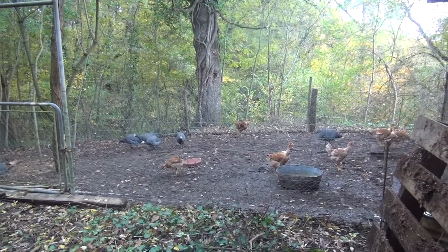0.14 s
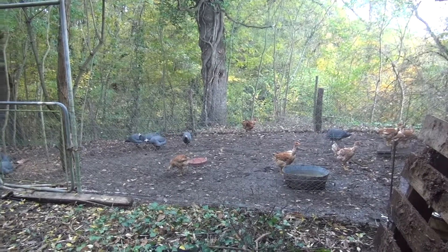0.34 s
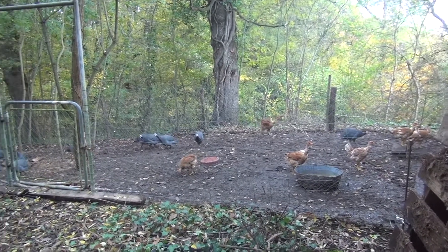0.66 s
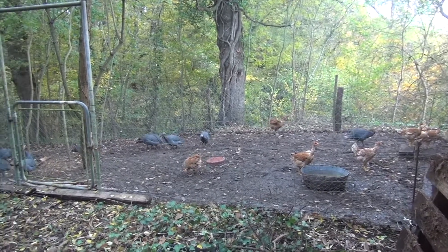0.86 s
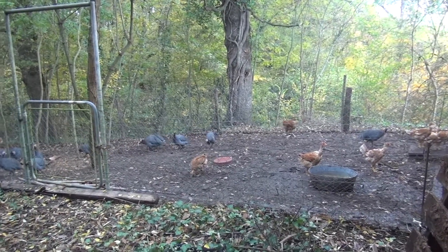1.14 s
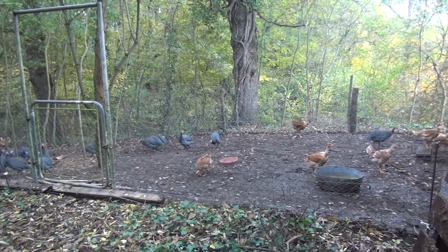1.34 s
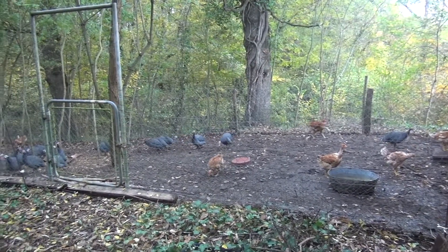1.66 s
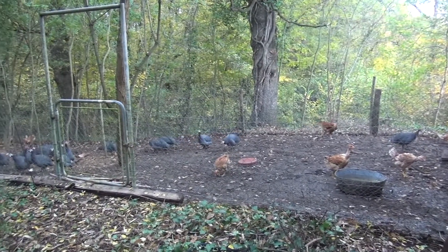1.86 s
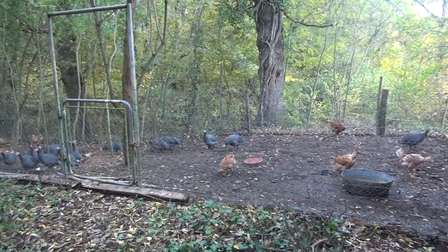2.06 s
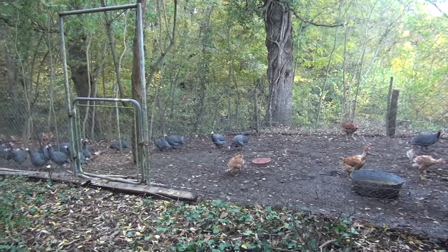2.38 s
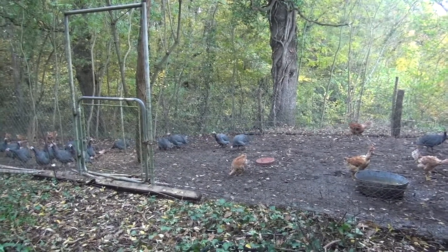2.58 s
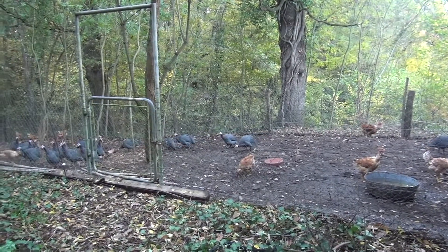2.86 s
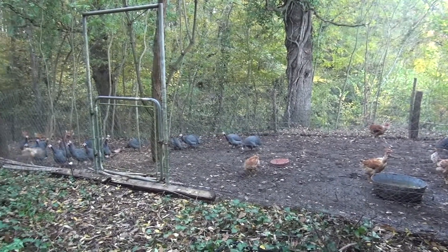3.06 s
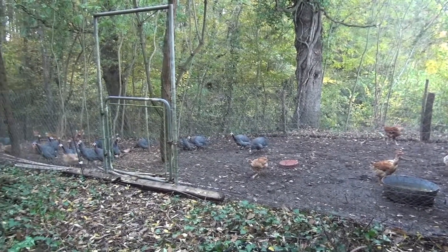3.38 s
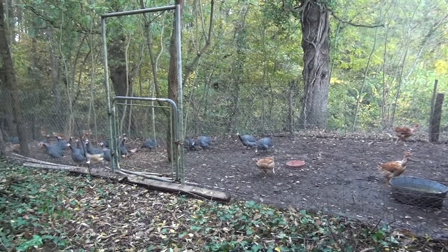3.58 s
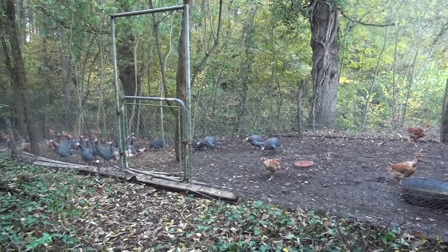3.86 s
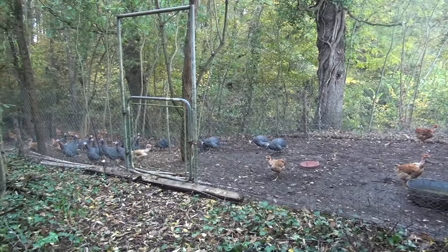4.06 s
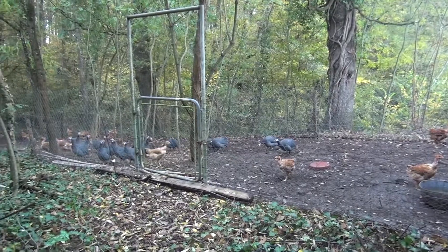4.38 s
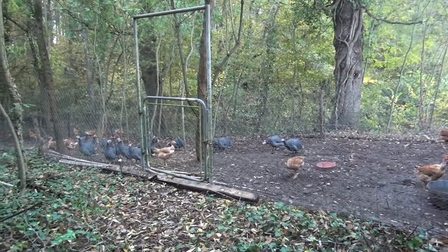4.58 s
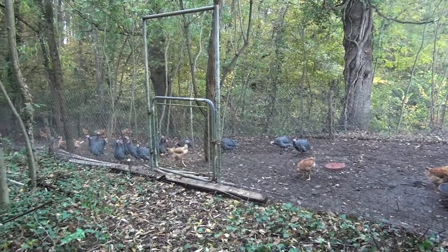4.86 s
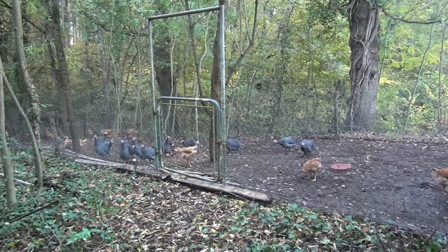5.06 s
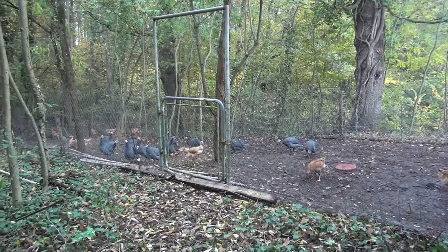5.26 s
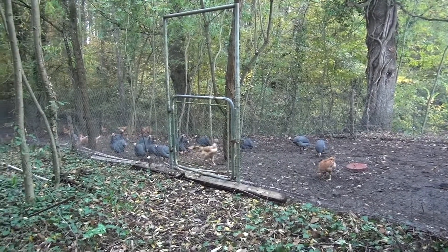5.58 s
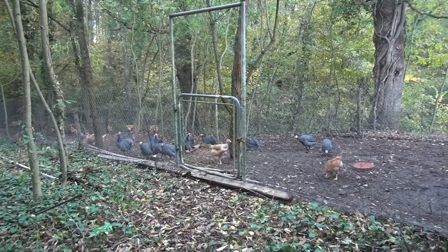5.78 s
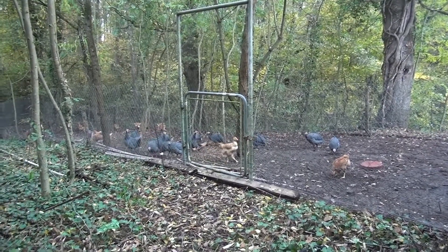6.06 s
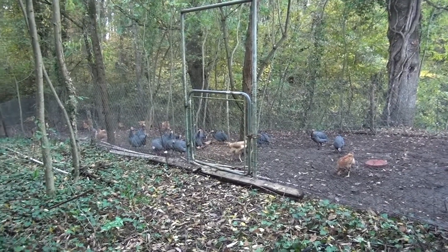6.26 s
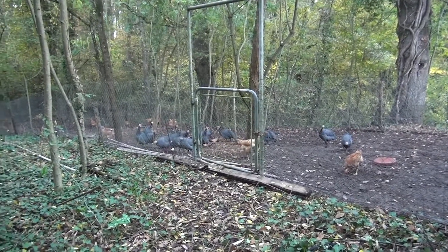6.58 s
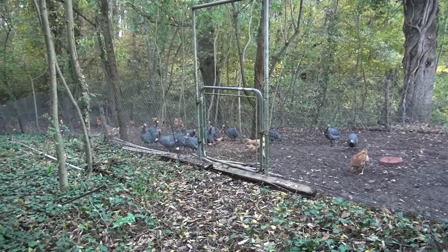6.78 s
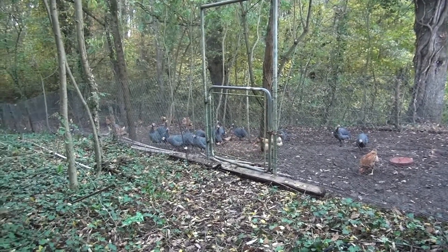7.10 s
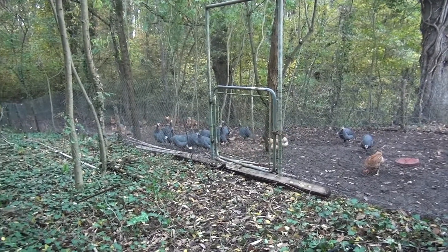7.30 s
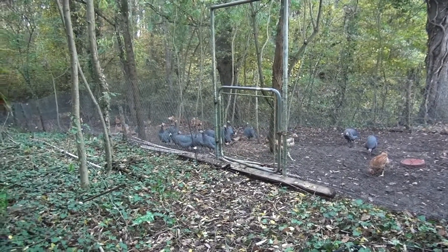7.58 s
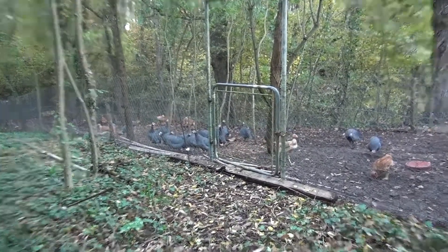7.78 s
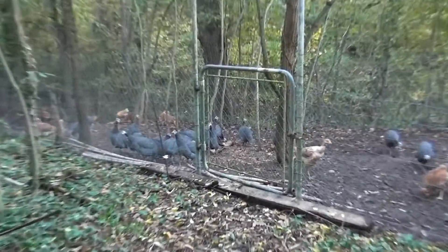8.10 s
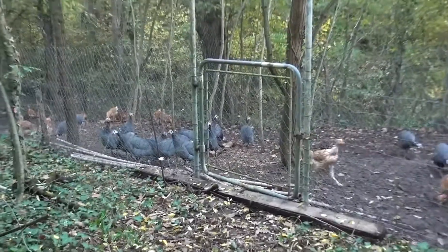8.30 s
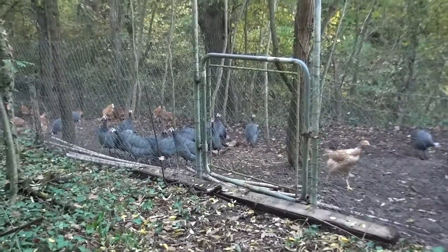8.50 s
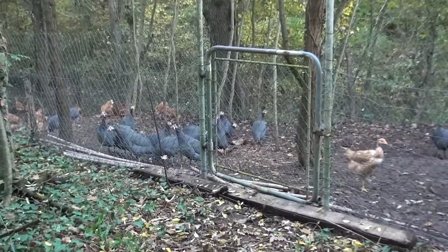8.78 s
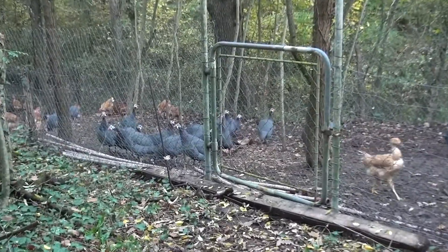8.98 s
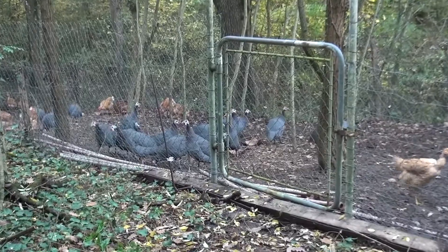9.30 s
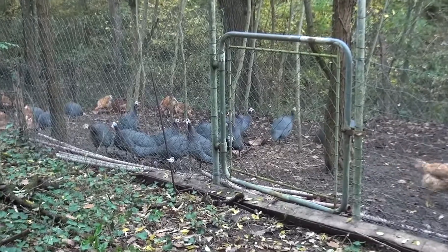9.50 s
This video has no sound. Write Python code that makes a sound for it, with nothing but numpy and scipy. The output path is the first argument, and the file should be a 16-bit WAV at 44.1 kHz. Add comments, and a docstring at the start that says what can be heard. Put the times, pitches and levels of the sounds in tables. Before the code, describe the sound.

Rapid, steady squawks from one guineafowl echo lightly among trees, with some microphone handling rumble at the start.

```python
"""Guineafowl at the edge of a wood

A guineafowl repeats a harsh cry about four times a second: a tick, a falling chirp and a short whistle
that breaks into a rasp. A fast membrane sings the whistle; a slow one beats out the rasp, whose pulses
excite the resonances of throat and beak. The ground cancels narrow bands and the trees scatter the
sound back. A hand-held microphone rumbles at first, over outdoor noise and a low hum."""
import sys
import numpy as np
from scipy import signal
from scipy.fft import rfft, irfft, next_fast_len
from scipy.io import wavfile
from scipy.ndimage import uniform_filter1d

SR = 44100
rng = np.random.default_rng(int(sys.argv[2]) if len(sys.argv) > 2 else 0)


def int16_out(signal):
    """Quantize to a 16-bit WAV file."""
    q = np.round(np.clip(np.atleast_2d(signal).T, -1, 1) * 32767)
    wavfile.write(sys.argv[1], SR, q.astype(np.int16))


N = 425124
RUN_IN = SR // 4   # samples before time zero, where the first cry begins


# Each row: start, length and whistle hold in seconds, base rasp pitch in Hz, force in dB.
CRIES = [(-.056, 0.061, 0.017, 307, 1.5), (0.183, 0.051, 0.0165, 304.5, -0.5),
         (.418, 0.056, .023, 315.8, -2.5), (0.638, .055, 0.026, 324, -3),
         (0.886, 0.058, 0.011, 307.6, -1.5), (1.147, .057, 0.008, 303, -0.5),
         (1.362, 0.055, 0.016, 309.4, 1), (1.582, .063, 0.012, 311.5, 3), (1.818, 0.062, 0.0083, 308.2, 2),
         (2.054, 0.07, 0.0056, 310.9, 1.5), (2.269, 0.063, 0.014, 306.3, -4),
         (2.497, 0.064, 0.0092, 309.3, -1), (2.751, 0.07, .014, 315.5, 0.5),
         (2.996, 0.058, 0.0062, 313.7, -0.5), (3.243, 0.064, 0.011, 308.8, 1.5),
         (3.545, 0.062, 0.012, 320.4, -1.5), (3.887, 0.063, 0.019, 320.6, -2),
         (4.141, 0.059, .006, 313.7, -2.5), (4.421, .065, 0.011, 314.5, -1.5),
         (4.681, 0.066, 0.011, 314.5, 1), (4.916, 0.065, 0.0099, 309.6, 2), (5.130, .068, 0.02, 313.6, 2),
         (5.401, .069, .011, 306.3, 1), (5.641, .068, 0.018, 309.3, 2.5),
         (5.855, 0.071, 0.0093, 314.2, 3.5), (6.078, 0.068, 0.016, 310.5, 2.5),
         (6.295, .078, 0.019, 321, 4.5), (6.526, 0.067, 0.029, 326.3, 3.5),
         (6.767, 0.065, 0.018, 316.2, 2.5), (7.011, .066, 0.019, 314, 3.5), (7.246, 0.065, 0.023, 319.5, 3),
         (7.470, 0.066, 0.03, 322.4, 2), (7.720, 0.068, 0.024, 323.2, 3), (7.955, 0.068, 0.025, 321, 3),
         (8.193, 0.07, 0.043, 308, 1.5), (8.426, 0.059, 0.012, 305.3, 1), (8.718, 0.058, 0.016, 313, 3.5),
         (8.995, 0.064, .022, 320.2, 3.5), (9.284, .069, 0.019, 309.5, 2.5), (9.565, 0.06, 0.015, 320, 1.5)]
# The bird grows keener, then eases a little. Each row: time in seconds, keenness from 0 to 1.
KEENNESS = [(.7, 0.01), (2.0, .35), (3.0, 0.21), (5.6, .5), (6.3, 0.76), (7.4, 0.99), (8.2, 0.97),
            (8.45, 0.65), (9.6, 0.68)]

def guineafowl():
    """Superposition: the cries add into one run, each voiced with the keenness of its moment."""
    out = np.zeros(RUN_IN + N + SR)
    t = np.arange(-SR // 36, SR // 10) / SR
    for start_s, *shape in CRIES:
        keenness, = columns_at(KEENNESS, start_s)
        start = RUN_IN + round((start_s + t[0]) * SR)
        out[start:start + len(t)] += cry(t, keenness, *shape)
    return out


# The course of a cry. Each row: share of its length, frequency ratios of rasp and throat,
# then level offsets in dB of throat, bright edge and deep note.
CRY_COURSE = [(0, 1.02, 1.07, 1, 2, -1.5), (.25, 1.015, 1.128, 5, 4.5, -3), (.48, 1.0, 1.066, 3, 4.5, 0),
              (.72, .975, 1.015, 6.5, 1, -3.5), (.93, .935, 0.962, 4, -6.5, -.5),
              (1.2, 0.882, .78, 9.5, -7, -1)]

def cry(t, keenness, length, hold, rasp_hz, force_db):
    """Source and filter: after chirp and whistle, a rasp of sagging pitch excites throat and beak."""
    share = t / length
    sag, glide, throat_arc, edge_arc, deep_arc = columns_at(CRY_COURSE, share)
    tilt_db = by_keenness(-0.9, 2.5, keenness) + 0.1 * force_db   # brightness of the voice
    roughness = from_db(2.5 * rng.standard_normal()) * (1 - 0.41 * fade(share - 0.7, 0.15))
    pitch_hz = rasp_hz * sag * (1 + 0.012 * wobble(70, len(t)))
    pulses, slow_phase = rasp(pitch_hz, jitter=0.03 * roughness, shimmer_db=2.6, breath=0.5 * roughness)
    # the treble throbs a few times in each cry
    throb = np.sin(2 * np.pi * (62 * t + rng.random() + 0.2 * wobble(55, len(t))))

    throat_db = by_keenness(-19, -18, keenness) + 0.06 * force_db + throat_arc
    voice = from_db(throat_db) * throat(pulses, length, glide, keenness)
    voice += beak(pulses, share, glide, throb, tilt_db, keenness)
    # the longer the whistle is held, the stronger it is and the less rasp sounds under it
    extra_hold_s = hold - 0.016
    under_whistle = from_db(-7.5 - 348 * extra_hold_s)
    rasp_gain = under_whistle + (0.92 - under_whistle) * fade(t - hold, 0.0097)
    voice = butterworth(voice, 6, 791, "high") * rasp_gain
    voice += from_db(-31.5 + force_db + edge_arc + 2.6 * throb) * bright_edge(pulses, tilt_db)
    voice *= fade(t - 0.001, 0.0074) * fade(length + 0.0023 - t, 0.0036)

    deep = from_db(deep_arc - 30) * deep_note(slow_phase)
    deep *= fade(t - hold, 0.018) * fade(length + 0.0097 - t, 0.0053)
    whistle_db = by_keenness(-19, -22, keenness) + 88 * extra_hold_s
    whistle_hz = by_keenness(1335, 1436, np.sqrt(keenness))
    note = from_db(whistle_db) * whistle(t, hold, whistle_hz, tilt_db, slow_phase)
    return chirp(t, keenness) + tick(t) + note + voice + deep


def rasp(pitch_hz, jitter, shimmer_db, breath):
    """Pulse excitation: the slow membrane slaps unevenly, one puff a cycle. Returns sound and phase."""
    size = len(pitch_hz)
    cycles = np.cumsum(pitch_hz) / SR
    uneven = np.maximum.accumulate(cycles + jitter * wobble(330, size))
    slaps = np.diff(np.floor(uneven), prepend=np.floor(uneven[0]))
    slaps *= from_db(shimmer_db * wobble(270, size))
    puffs = rng.standard_normal(size) * (1 + np.cos(2 * np.pi * uneven)) ** 2
    return rms_one(slaps) + breath * rms_one(puffs), 2 * np.pi * cycles


def throat(pulses, length, glide, keenness):
    """Cavity resonance: a longer cry opens the throat further, which lowers its frequency."""
    usual_length_s, drop_hz_per_s = 0.065, 5300
    hz = by_keenness(1703, 1528, keenness) - drop_hz_per_s * (length - usual_length_s)
    return evened(resonance(pulses, hz * glide, width_hz=306))


# Resonances of windpipe and beak. Each row: centre and width in Hz, then relative level in dB
# early, midway and late in the cry.
FORMANTS = [(909.5, 89, -8, -15, -17), (1166, 152, -4.5, -9.5, -11.5), (2210, 128, 4.5, -1.5, -5),
            (2967, 510, 7.5, -21, -3), (3380, 290, 3, 3, -0.5), (3882, 294, 3, 3, -5),
            (4318, 387, 5, 1, -6)]

def beak(pulses, share, glide, throb, tilt_db, keenness):
    """Formants: parallel resonances shape the rasp and partly follow the throat as the beak closes."""
    closing = glide ** (0.5 * fade(share - 0.72, 0.1))
    out = np.zeros(len(pulses))
    for hz, width_hz, *arc_db in FORMANTS:
        level_db = by_keenness(-16, -20.5, keenness) + np.interp(share, [0.12, 0.5, 0.9], arc_db)
        level_db += 6.35 * throb * np.exp(-((hz - 3500) / 600) ** 2)
        level_db += 1.1 * tilt_db * max(np.log2(hz / 3000), 0)
        level_db += by_keenness(-2, 3, keenness) * (hz > 4100)   # the top pierces more when keen
        level_db += 1.1 * rng.standard_normal()   # no two cries are quite alike
        centre_hz = hz * closing * (1 + 0.015 * rng.standard_normal())
        out += from_db(level_db) * evened(resonance(pulses, centre_hz, width_hz))
    return out


# The top of the rasp. Each row: frequency in Hz, relative spectral level in dB.
EDGE_SPECTRUM = [(3500, -44), (5000, -8), (5800, 6), (6700, -6), (7800, 5.5), (9000, 4.5), (9800, 0),
                 (10800, 0.5), (12500, -10.5), (15500, -26)]

def bright_edge(pulses, tilt_db):
    """Turbulence: rushing air adds hiss to the pulses and sharpens the top of the rasp."""
    hiss = pulses + 1.23 * rng.standard_normal(len(pulses))
    tilted = [(hz, db + 5.5 * tilt_db * np.log2(hz / 8000)) for hz, db in EDGE_SPECTRUM]
    return evened(butterworth(coloured(hiss, tilted), 6, 1740, "high"), size=160)


# Each row: harmonic number, relative level in dB.
DEEP_HARMONICS = [(1, 1.5), (2, -9.5), (3, -0.5), (4, 1.5), (5, 5.5)]

def deep_note(phase):
    """Harmonic series of the slow membrane: phase jitter shakes the higher partials most."""
    shaken = phase + 0.15 * wobble(263.7, len(phase))
    return sum(from_db(db) * np.sin(round(k) * shaken) for k, db in DEEP_HARMONICS)


# Each row: harmonic number, relative level in dB before the tilt.
WHISTLE_HARMONICS = [(1, 2), (2, 5), (3, 1), (4, -17), (6, -35), (7, -32), (8, -37)]

def whistle(t, hold, hz, tilt_db, slow_phase):
    """Modulation: the slow membrane shakes the fast one's note, which bends up and dulls as it breaks."""
    breaking = fade(t - hold, 0.0068)
    waver = 0.0097 * (1 + 2 * breaking) * wobble(505, len(t))
    pitch_hz = hz * (1 + 0.065 * breaking + waver)
    phase = 2 * np.pi * np.cumsum(pitch_hz) / SR + (0.16 + 1.5 * breaking) * np.sin(slow_phase)
    db_per_octave = tilt_db / 2 - 4 * breaking
    note = sum(from_db(db + db_per_octave * np.log2(k)) * np.sin(round(k) * phase)
               for k, db in WHISTLE_HARMONICS)
    tremolo = 1 + 0.36 * (0.43 + breaking) * np.cos(slow_phase)
    return np.sqrt(2) * note * tremolo * fade(t, 0.002) * fade(hold + 0.0031 - t, 0.0073)


# Each row: time from the cry's start in seconds before stretching, centre in Hz, relative level in dB.
CHIRP_PATH = [(-.012, 3200, -20), (-.006, 3020, -6), (-.003, 2720, 3.5), (.001, 2290, 1), (.008, 2210, -7)]

def chirp(t, keenness):
    """Swept resonance: a scratchy band of noise falls into the note, faster when the bird is keen."""
    path_time = t / by_keenness(1.33, 0.82, keenness)
    hz, db = columns_at(CHIRP_PATH, path_time)
    hz *= 1 + 0.066 * rng.standard_normal() + 0.063 * wobble(401, len(t))
    swoop = evened(resonance(rng.standard_normal(len(t)), hz, width_hz=280), size=200)
    envelope = fade(path_time + 0.015, 0.0032) * fade(0.009 - path_time, 0.0022)
    return from_db(db + by_keenness(-13.5, -16.5, keenness)) * envelope * swoop


# Each row: frequency in Hz, relative spectral level in dB.
TICK_SPECTRUM = [(80, -1), (300, 4), (900, -3.5), (2200, 7), (3300, -8), (4500, -2)]

def tick(t):
    """Onset transient: the voice catches with a dull burst of noise just before the cry."""
    noise = rms_one(coloured(rng.standard_normal(len(t)), TICK_SPECTRUM))
    envelope = np.exp(-((t + 0.0167) / 0.0026) ** 2)
    return butterworth(from_db(-26) * noise * envelope, 4, 4500, "low")


# Each row: centre of a cancelled band in Hz, its width in Hz.
GROUND_NOTCHES = [(2040, 35), (2600, 182), (3620, 11)]

def over_ground(x):
    """Destructive interference: direct and ground-reflected sound cancel in narrow bands."""
    for hz, width_hz in GROUND_NOTCHES:
        x = signal.lfilter(*signal.iirnotch(hz, hz / width_hz, fs=SR), x)
    return x


# Each row: delay in seconds, level in dB relative to the direct sound.
TRUNK_ECHOES = [(.052, -24), (.084, -46)]

def woodland(x):
    """Reverberation: echoes and scatter follow the direct sound; far trees answer later and longer."""
    response = from_db(-14) * scatter(t60=0.1, delay=0.008)
    response += from_db(-14.5) * scatter(t60=0.27, delay=0.043)
    response += from_db(-27) * scatter(t60=0.89, delay=0.07)
    response[:, 0] += 1   # direct path
    for delay, db in TRUNK_ECHOES:
        response[:, round(delay * SR)] += from_db(db)
    return signal.fftconvolve(x[None], response, axes=1)


# The colour of the sound thrown back by the wood. Each row: frequency in Hz, gain in dB.
WOOD_SPECTRUM = [(200, -13), (330, 1.5), (600, 7.5), (1000, -4), (1450, 0.5), (1850, 6), (2300, 3.5),
                 (2900, 4), (4400, 2), (6000, 3), (9000, -5), (15000, -32)]

def scatter(t60, delay):
    """Diffuse scattering: the response of many trunks and leaves builds up, then decays exponentially."""
    t = np.arange(SR) / SR
    tail = rng.standard_normal((2, SR)) * from_db(-60 * t / t60) * fade(t - delay, delay / 3)
    mid, side = coloured(tail / np.sqrt(np.sum(tail[0] ** 2)), WOOD_SPECTRUM)
    return 0.8 * mid + 0.57 * side * np.array([[1], [-1]])


# Each row: frequency in Hz, level of left over right in dB.
LEVEL_DIFFERENCE = [(100, 1), (300, 3.9), (700, 5.3), (1300, 5.3), (1900, 2.8), (2600, 0.55), (4400, 2.3),
                    (8000, 0.46), (15000, .4)]
# Each row: frequency in Hz, phase lead of left over right in radians.
PHASE_DIFFERENCE = [(0, 0), (1640, -0.51), (2070, 0.83), (2500, -1.28), (2760, -0.3), (3620, 0.12),
                    (5000, 0.26), (6030, -0.83), (15200, 0.13)]

def microphone_ports(x):
    """Level and phase differences: the bird is to the left, so that port hears it louder."""
    size = next_fast_len(x.shape[-1])
    hz = np.fft.rfftfreq(size, 1 / SR)
    left = from_db(at_hz(LEVEL_DIFFERENCE, hz) / 2) * np.exp(0.5j * at_hz(PHASE_DIFFERENCE, hz))
    return irfft(rfft(x, size) * np.array([left, 1 / left]), size)


# Each row: frequency in Hz, relative spectral level in dB.
RUMBLE_SPECTRUM = [(12, -36), (20, 10.5), (139, 0.5), (231, -7), (335, -12.5), (414, -20), (492, -25.5),
                   (600, -21), (780, -29), (1320, -120)]
# The hand slides on the housing. Each row: start in seconds, length in seconds, level in dB.
HAND_SLIDES = [(0.008, 0.091, -15.5), (0.132, .05, -17.5), (0.264, 0.12, -20), (0.472, 0.19, -27.5),
               (0.682, 0.13, -33), (1.278, 0.074, -27), (1.405, 0.14, -31)]
# The hand knocks on the housing. Each row: start in seconds, level in dB.
HAND_KNOCKS = [(0.021, -10), (.072, -12), (.143, -33), (0.276, -18), (0.319, -23), (1.319, -8.5),
               (1.513, -10)]

def handling():
    """Structure-borne noise: the microphone rumbles as it swings, and the hand slides and knocks on it."""
    t = np.arange(N) / SR
    swing_db, calming_db_per_s, rest_s = -29, 9, 2.15
    level = from_db(swing_db - calming_db_per_s * t) * fade(rest_s - t, 0.1)
    for start, length, db in HAND_SLIDES:
        slide = from_db(db) * fade(t - start, 0.0067) * fade(start + length - t, 0.021)
        level = np.hypot(level, slide)   # powers add
    out = level * stereo_noise(RUMBLE_SPECTRUM, width=0.5)
    for start, db in HAND_KNOCKS:
        age = np.clip(t - start, 0, 1)
        out += from_db(db) * np.sin(2 * np.pi * 80 * age) * np.exp(-age / 0.0055)
    return butterworth(out, 2, 48, "high")


# Each row: frequency in Hz, relative spectral level in dB.
AIR_SPECTRUM = [(20, -4), (110, -11.5), (300, 9), (450, 1), (900, 6), (1700, 9.5), (2500, 2), (3300, -4),
                (6000, -9.5), (11000, -15.5), (15500, -23)]

def outdoor_background():
    """Stationary noise: a broad, soft hiss lies over a low, nearly centred hum."""
    air = from_db(-40.5) * stereo_noise(AIR_SPECTRUM, width=0.41)
    hum_hz_db = [(20, -19), (60, -2.5), (115, -1.5), (200, -5), (400, -20), (1500, -43), (8000, -80)]
    return air + from_db(-44.5) * stereo_noise(hum_hz_db, width=0.078)


def by_keenness(calm, keen, keenness):
    """Linear blend of a voice setting between its calm and keen values."""
    return calm + (keen - calm) * keenness


def from_db(db):
    """Amplitude ratio of a level in decibels."""
    return 10 ** (np.asarray(db) / 20)


def rms_one(x):
    """Normalisation to unit power."""
    return x / np.sqrt(np.mean(x ** 2) + 1e-20)


def evened(x, size=500):
    """Evens out loudness like a limiter, holding the sound near rms 1 over `size` samples."""
    return x / np.sqrt(np.abs(uniform_filter1d(x ** 2, size=size)) + 1e-9 * np.mean(x ** 2))


def columns_at(rows, x):
    """Linear interpolation of the other columns where the first equals x."""
    first, *columns = np.transpose(rows)
    return [np.interp(x, first, c) for c in columns]


def at_hz(points, hz):
    """Interpolation on a logarithmic frequency axis."""
    f, value = np.transpose(points)
    return np.interp(np.log(hz + 1), np.log(f), value)


def coloured(x, spectrum):
    """Spectral weighting by points of frequency in Hz and gain in dB."""
    size = next_fast_len(x.shape[-1])
    gain = from_db(at_hz(spectrum, np.fft.rfftfreq(size, 1 / SR)))
    return irfft(rfft(x, size) * gain, size)[..., :x.shape[-1]]


def butterworth(x, order, hz, kind):
    """Maximally flat high-pass or low-pass filtering."""
    return signal.sosfilt(signal.butter(order, hz, kind, fs=SR, output="sos"), x)


def resonance(x, hz, width_hz):
    """A two-stage resonator whose centre may move."""
    carrier = np.exp(2j * np.pi * np.cumsum(hz) / SR)
    r = np.exp(-np.pi * width_hz * np.sqrt(2) / SR)
    return (signal.lfilter([1], [1, -2 * r, r * r], x / carrier) * carrier).real


def wobble(rate, size):
    """Random fluctuation of rms 1 through `rate` new values a second."""
    knots = np.arange(size) * rate / SR
    return rms_one(np.interp(knots, np.arange(size), rng.standard_normal(size)))


def fade(t, width):
    """A smooth step from 0 to 1 at t = 0."""
    return (1 + np.tanh(t / width)) / 2


def stereo_noise(spectrum, width):
    """Partial coherence: both sides share one coloured noise and take a second in opposite phase."""
    mid, side = rms_one(coloured(rng.standard_normal((2, N)), spectrum))
    return mid + width * side * np.array([[1], [-1]])


def scene():
    """Source, path and receiver: the cries cross ground and wood, then join the background noises."""
    bird = microphone_ports(woodland(over_ground(guineafowl())))[:, RUN_IN:RUN_IN + N]
    return from_db(0.45) * bird + outdoor_background() + handling()


def record(dry):
    """Soft saturation rounds the loudest peaks, and a low-pass filter cuts the top."""
    rounded = dry / (1 + dry ** 6) ** (1 / 6)
    low_pass = signal.firwin(255, cutoff=15700, fs=SR)
    return signal.fftconvolve(rounded, low_pass[None], "same", axes=1)


dry = scene()
out = record(dry)
int16_out(out)
```